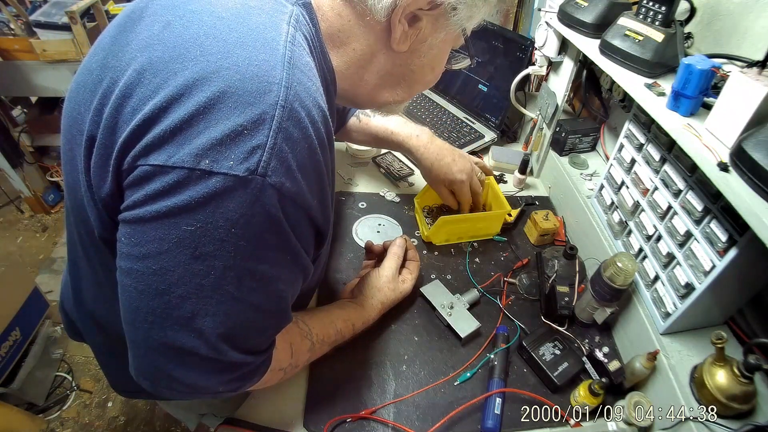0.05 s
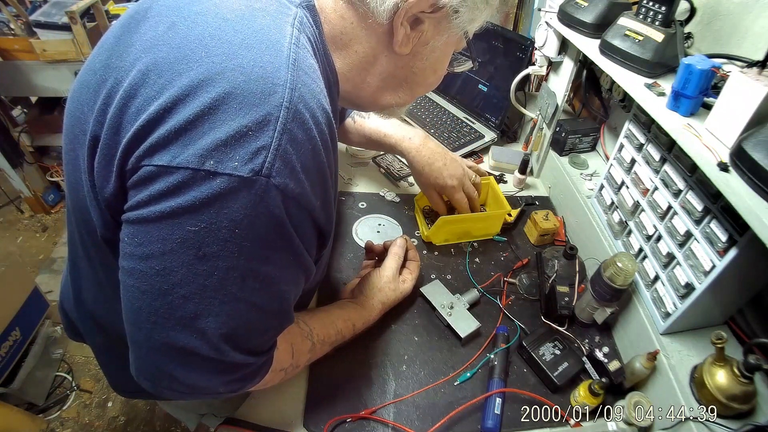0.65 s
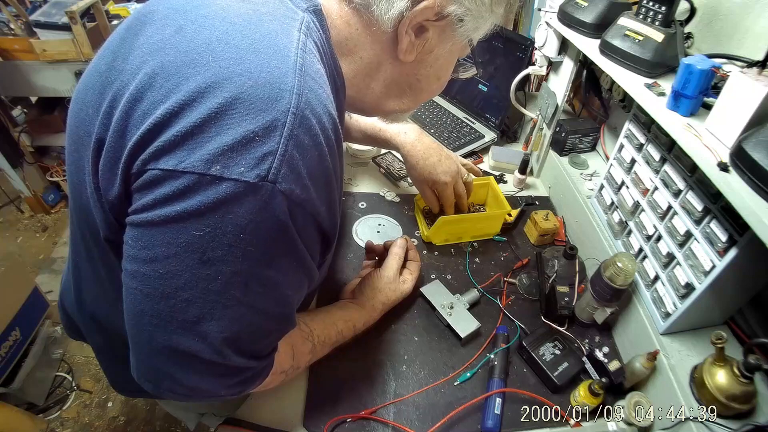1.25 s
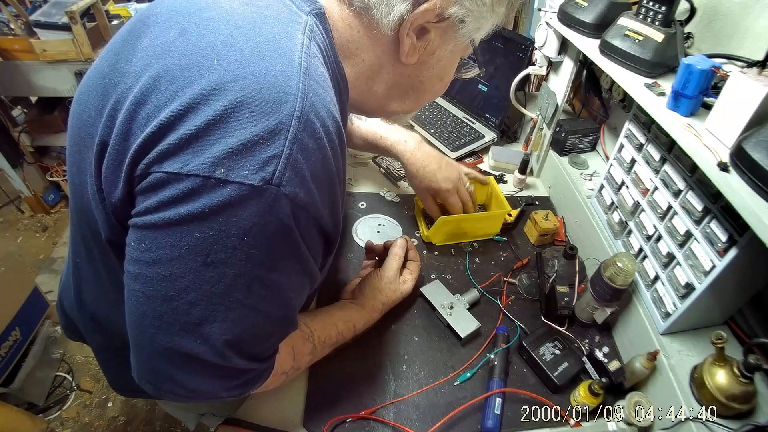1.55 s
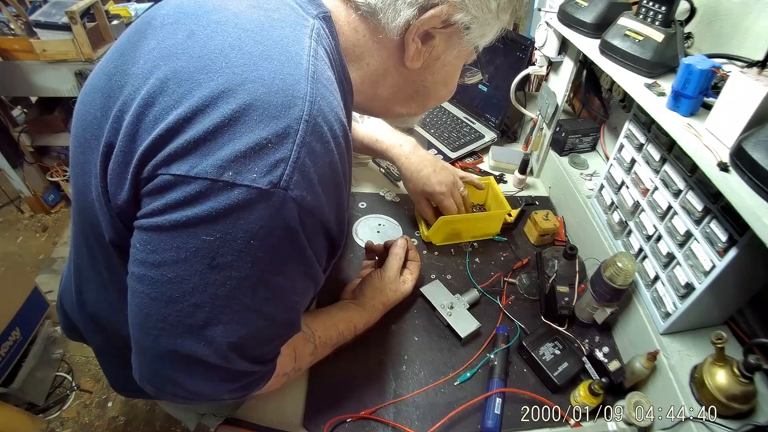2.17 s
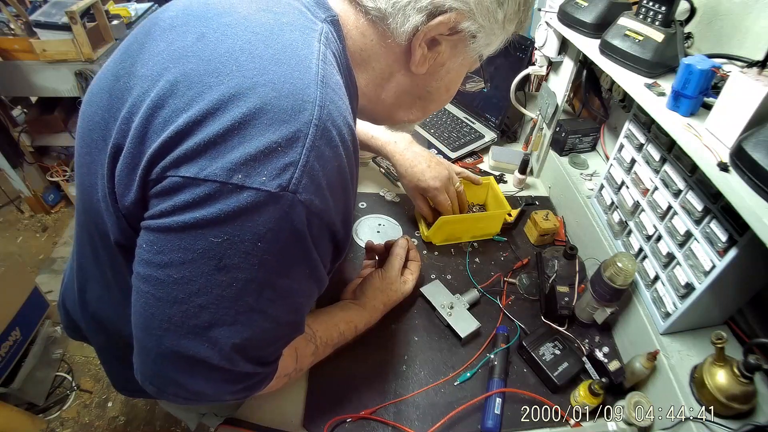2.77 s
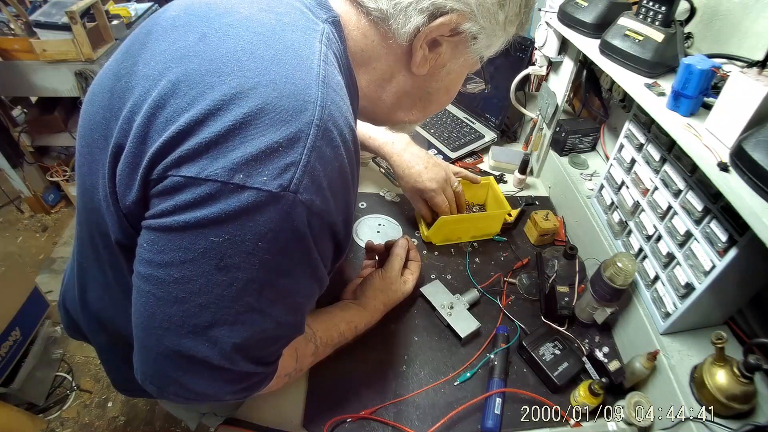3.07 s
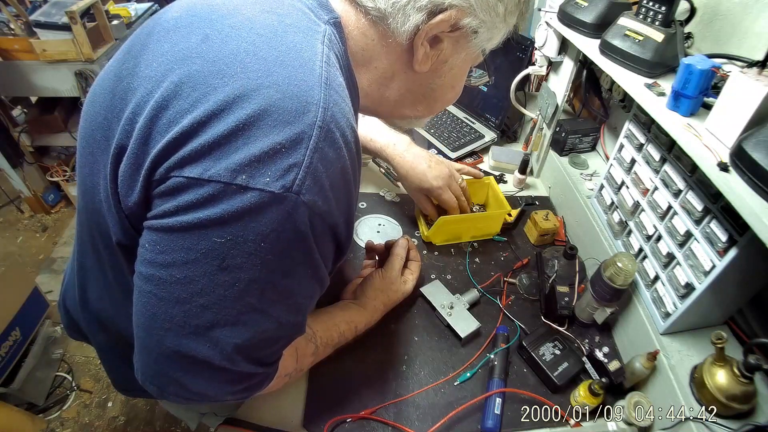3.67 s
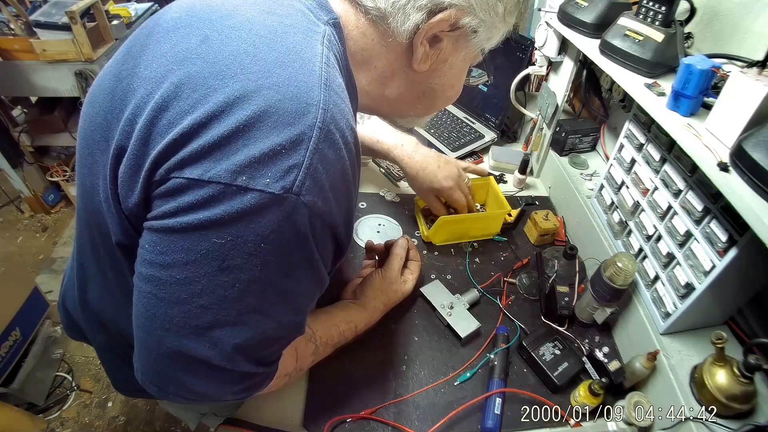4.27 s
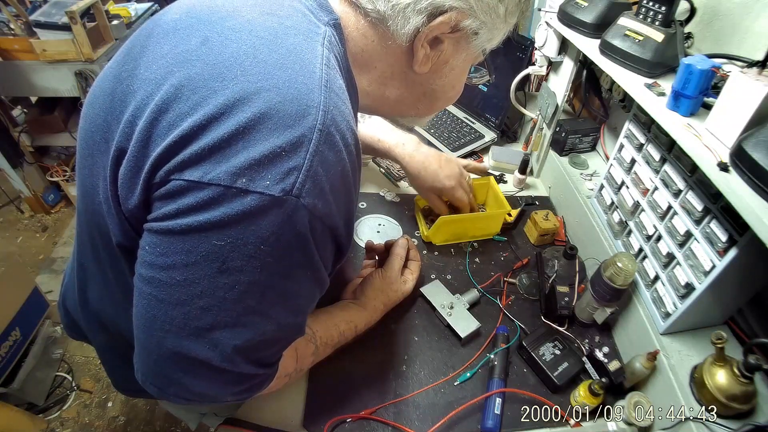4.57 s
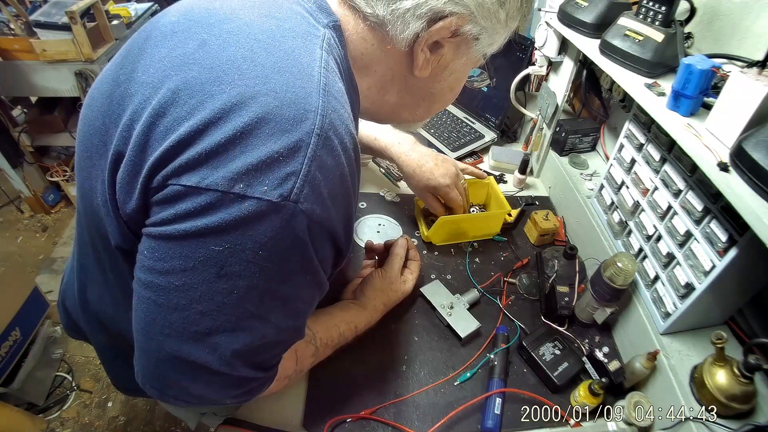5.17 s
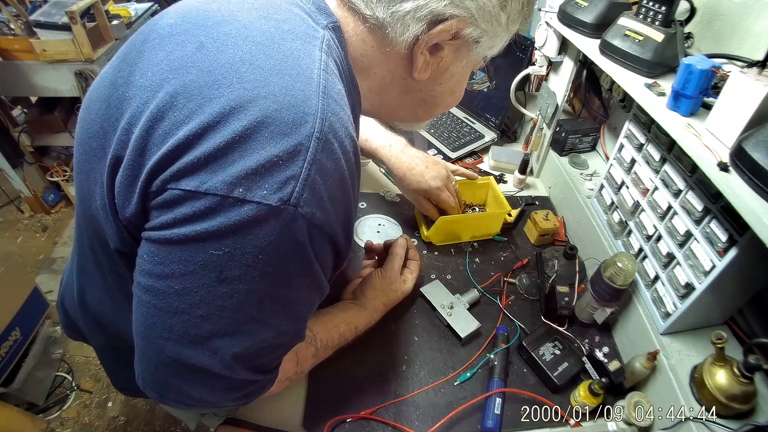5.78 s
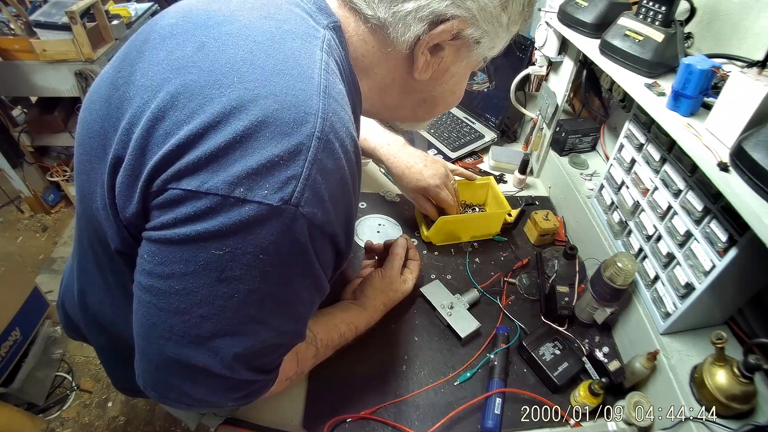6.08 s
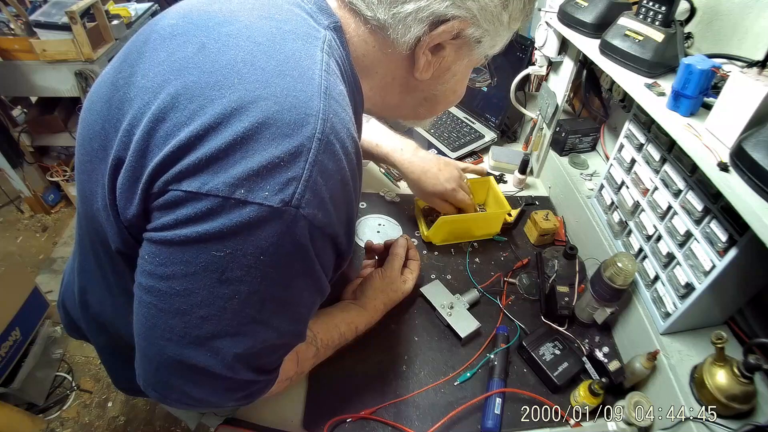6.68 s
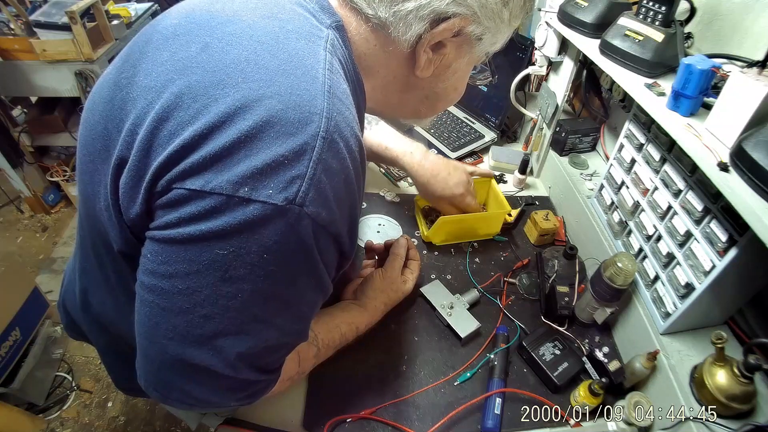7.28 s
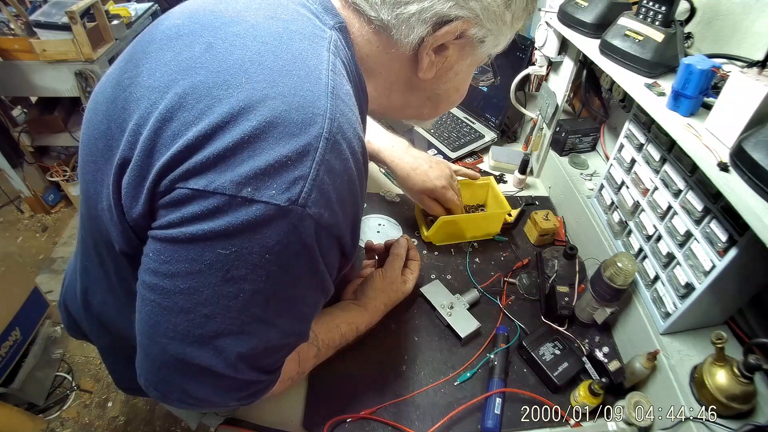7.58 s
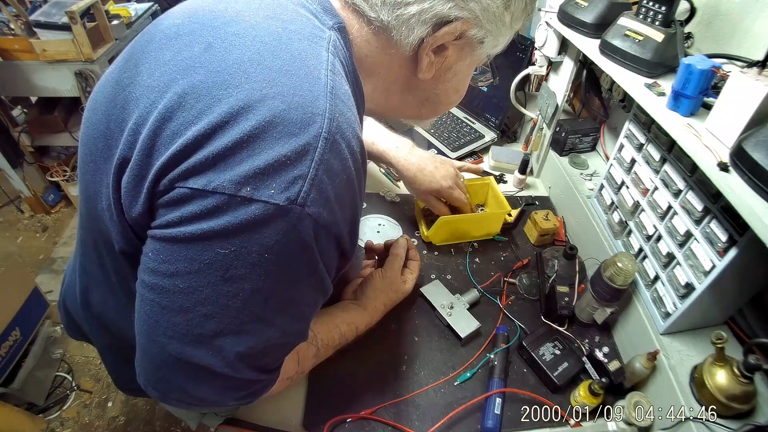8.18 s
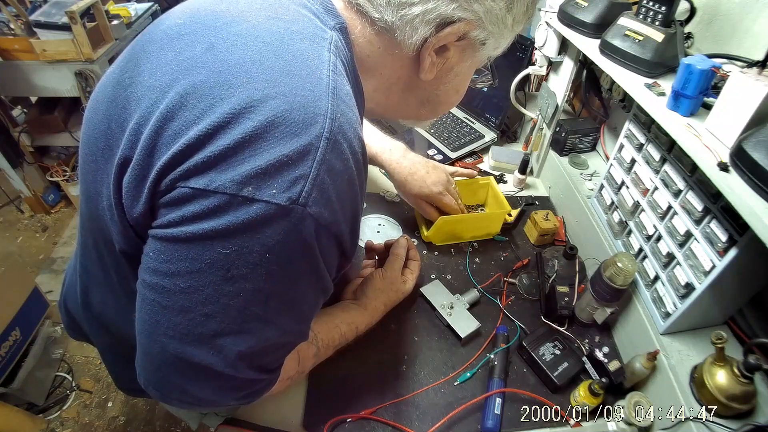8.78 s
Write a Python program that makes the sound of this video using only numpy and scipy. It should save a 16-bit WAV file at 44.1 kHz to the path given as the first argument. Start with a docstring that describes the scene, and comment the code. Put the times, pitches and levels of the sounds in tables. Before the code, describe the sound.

Small parts clatter and click against a plastic bin as fingers stir them in bursts, with short pauses, in a quiet workshop.

```python
"""A busy clatter of small loose parts: a hand rummages through a plastic bin on a workbench.
Each stroke sets off a shower of tiny collisions that ring the bin's walls. Single parts drop with a clack,
fingers knock on the hollow floor, and a few pings, metal shivers and dull bench bumps join in.
The cluttered workshop answers briefly over a soft rumble, a low hum and microphone hiss."""
import sys
import numpy as np
from scipy import signal
from scipy.fft import rfft, irfft, next_fast_len
from scipy.io import wavfile
from scipy.ndimage import uniform_filter1d

SR = 44100
rng = np.random.default_rng(int(sys.argv[2]) if len(sys.argv) > 2 else 0)


def wav_record(signal):
    """Record a signal, one row per channel, as 16-bit PCM in the file named by sys.argv[1]."""
    frames = np.transpose(np.atleast_2d(signal))
    bounded = np.clip(frames, -1, 1)
    # unit amplitude maps onto the largest positive 16-bit level
    quanta = np.round(bounded * 32767).astype(np.int16)
    wavfile.write(sys.argv[1], SR, quanta)


N = 398663
TIME = np.arange(N) / SR
AGE = np.arange(SR // 6) / SR  # time since a hit [s]

# hand strokes: (peak time [s], swell [s], fade [s], relative clatter level [dB], wall over clatter [dB])
STROKES = [(.012, 0.11, .085, -44, 0.5), (.205, .03, .04, -62.5, 18), (.24, .034, .08, -39, 2),
           (.345, 0.08, 0.092, -39, -1), (0.409, .05, 0.092, -45, 4), (.555, 0.095, 0.092, -56, 2),
           (.668, .03, 0.052, -61.5, 4), (.735, 0.039, .08, -60, 1), (.838, .11, 0.092, -49, 1),
           (0.959, .04, 0.099, -50, 3.5), (1.08, 0.078, .08, -64, 2), (1.192, 0.069, 0.058, -53, 3),
           (1.265, 0.037, 0.11, -50, 1.5), (1.4, .08, 0.091, -66, 2.5), (1.482, 0.082, 0.09, -59.5, 4),
           (1.645, .1, 0.086, -42.5, 0.5), (1.784, 0.13, 0.09, -50, 0.5), (1.872, 0.094, .08, -46, 4.5),
           (1.96, 0.049, 0.062, -49.5, -3), (2.092, .018, 0.052, -52.5, 2), (2.2, .12, .095, -41, 2.5),
           (2.335, .07, .04, -52.5, 1), (2.562, 0.04, 0.055, -52, 9), (2.625, 0.059, 0.087, -50.5, 1.5),
           (2.715, 0.046, 0.14, -60, 2.5), (2.94, 0.049, 0.064, -53, 4.5), (3.04, 0.053, 0.088, -41, -1),
           (3.455, 0.077, 0.046, -62, -7.5), (3.547, 0.029, 0.065, -61.5, -2),
           (3.745, 0.052, 0.058, -38, 1), (3.797, 0.031, 0.048, -46, 4), (3.871, 0.11, 0.091, -54, 1.5),
           (3.998, 0.035, 0.044, -51.5, 1.5), (4.063, 0.039, .06, -44, 1), (4.295, 0.072, 0.12, -50, 0.5),
           (4.372, 0.0828, 0.075, -50, 4), (4.635, 0.058, 0.0812, -41, 2.5),
           (4.69, 0.052, 0.058, -42, -1.5), (4.82, 0.098, 0.1, -63, 2), (5.42, .035, .06, -42, 1.5),
           (5.47, 0.046, 0.096, -45, 2.5), (5.56, .06, .13, -59, -0.5), (5.713, .018, 0.047, -52, 5.5),
           (6.509, 0.081, 0.08, -39, 1), (6.757, 0.051, .09, -35, 1.5), (6.814, .05, 0.05, -40, -1),
           (6.985, 0.033, 0.063, -43, 4), (7.055, 0.077, 0.069, -36, 3), (7.14, .04, 0.074, -47, 4),
           (7.335, 0.087, 0.089, -35, 1.5), (7.453, 0.039, 0.078, -53.5, 4.5),
           (8.275, 0.019, 0.055, -52.5, 4), (8.328, .025, .13, -48.5, 3.5), (8.445, 0.059, 0.096, -51, 2.5),
           (8.54, .05, 0.12, -58.5, 2.5), (8.825, .08, 0.17, -68.5, 2.5)]
STROKE_DROP_DB, STROKE_ROUND = 20, 1.25  # depth of a swell or fade; roundness of the top (1 = pointed)
REST_CLATTER_DB, REST_WALL_DB = -75, -74.5  # relative levels while the fingers only feel about
# single parts striking a wall: (time [s], wall energy [dB], clack over wall [dB], brightness [dB])
DROPS = [(0.2285, -16, 5.5, -2), (0.254, -11.5, 1, -1), (0.3163, -11, 0, 0), (0.3402, -5, -1, -19),
         (0.3944, -10.5, 0, -4), (0.41, -7, -1, -9.5), (0.7983, -26, 5, -4), (.8918, -25, 7.5, -10),
         (0.9326, -17, 7, -4.5), (0.9524, -9.5, 2, -11.5), (1.0015, -13, -13, -2), (1.5585, -23, -1, 5),
         (1.6211, -20, -2, -1), (1.6324, -8, 2, -3.5), (1.718, -27, 6, 10), (1.77, -25, 7.5, -6),
         (1.841, -24, 10, -17), (1.8619, 1.5, -8.5, -3.5), (1.9015, -15.5, 1.5, -10),
         (1.9427, -21.5, 2.5, -5), (1.9856, -19, 4.5, -14), (2.0856, -23.5, 4.5, -1), (2.216, -12.5, 0, -8),
         (2.302, -28.5, 3, -12), (2.443, -31.5, -0.5, 0), (2.5565, -23.5, 8, -9.5),
         (2.5997, -23.5, 6, -1.5), (2.8119, -34, 4, -3), (2.9053, -29.5, 5, 5), (2.9917, -12, -1, -1),
         (3.0118, -9, -1.5, -3), (3.0547, -16.5, 4, -20), (3.427, -39, 8, 4), (3.543, -31.5, 8, -5),
         (3.701, -19, 1, -4), (3.7434, -4.5, -2, -10), (3.7535, -1.5, -5, -2), (3.8996, -25, 5, -11),
         (3.9797, -24.5, -0.5, 12), (4.063, -15, 1, -2.5), (4.0878, -15, -8, -8), (4.649, -14, 0, 3),
         (5.1105, -28.5, 2.5, -6), (5.4198, -7.5, -4, -5), (5.4265, -2, -6.5, 17), (5.655, -37.5, 4, 3),
         (5.7127, -22.5, 2.5, -15), (6.471, -23.5, 8, 7), (6.525, -9, -9, 5.5), (6.7339, -5, -4.5, 7),
         (6.7715, -14, 1, 3), (6.8061, -7.5, -5, -14), (6.9829, -10, -12, 10), (7.0248, -8.5, -0.5, 0),
         (7.0731, -10, -5, -10), (7.1138, 1, -13.5, -5.5), (7.259, -14, -3, 4), (7.2817, -10, -6, 7),
         (7.3595, -4, -10, 11), (8.334, -15, -8.5, -1), (8.3603, -20, 8.5, -6), (8.4053, -14, 0, -12.5),
         (8.528, -30.5, 4, 8), (8.5823, -18.5, -2, -16), (8.7596, -37, 3.5, -2)]
DROP_THUMP_DB = -27.5  # a light part hardly moves the floor
GRAZE_LEAD_S, GRAZE_DB = .006, -12.5  # a falling part brushes its neighbours just before it strikes
# fingers knocking on the bin's floor: (time [s], thump energy [dB])
TOCKS = [(0.1759, -10.5), (.6667, -29), (0.7295, -26), (1.2967, -24), (1.6324, -18), (2.1352, -20),
         (2.5996, -21.5), (4.2555, -20), (4.3821, -20), (5.3588, -24.5), (6.414, -29), (6.7334, -21),
         (6.955, -24), (6.9849, -13.5), (8.181, -31), (8.2478, -8.5)]
TOCK_WALL_DB, TOCK_CLACK_DB, TOCK_BRIGHT_DB = -5, -18, -6  # a soft finger shakes walls but few parts

# ring of the bin's walls: (frequency [Hz], relative level [dB], t60 [s])
WALL_MODES = [(560, -16, .04), (708, -9, .045), (778, -7, .045), (832, -4, .06), (915, -9, .04),
              (975, -6, .045), (1006, 2, .065), (1140, -8, .045), (1222, -6, .055), (1280, -9, .045),
              (1370, -10, .055)]
# ring of the parts and the bin's higher modes: (frequency [Hz], relative level [dB], t60 [s])
PART_MODES = [(1554, -10.5, 0.032), (1686, -7, 0.12), (1803, -4.5, 0.051), (1946, 2.5, 0.045),
              (2020, 3.5, 0.026), (2200, 0, 0.032), (2296, -9.5, 0.023), (2410, 0, 0.036),
              (2593, -3.5, 0.068), (2840, -16.5, 0.072), (3230, -7, 0.086), (3484, -3.5, 0.068),
              (3657, -2.5, 0.042), (3877, -1.5, 0.058), (4300, -20.5, 0.11), (4630, -33, .04),
              (5066, -7, 0.041), (5620, -6, 0.02)]
# the bin's floor giving way under a blow: (frequency [Hz], relative level [dB], t60 [s])
FLOOR_MODES = [(405, -6, 0.035), (514, 0.5, 0.038), (630, -8, 0.029), (775, 0.5, 0.036)]
# the thin walls radiate little bass: (frequency [Hz], gain [dB])
WALL_EQ = [(200, -18.5), (450, 0), (620, -1.5), (760, -1.5), (1400, 1.5), (2200, -8), (5000, -23)]
# the parts are too small to radiate low tones: (frequency [Hz], gain [dB])
PART_EQ = [(300, -28), (900, -4), (1500, 0.5)]
# the crack of a hard contact: (frequency [Hz], gain [dB])
CRACK_EQ = [(900, -32.5), (1500, 2.5), (2300, 3), (2900, -3.5), (3700, 0), (5400, -2), (7000, -12.5),
            (8600, -12.5), (10500, -14), (11900, -26.5), (14000, -23), (16000, -40)]

# things left ringing freely: (time [s], pitch [Hz], level [dB], t60 [s])
PINGS = [(.378, 10770, -43.5, 0.076), (4.78, 13810, -62.5, .15), (5.73, 427.6, -49, 0.29)]
# tiny metal bits shivering against each other: (time [s], energy [dB])
SHIVERS = [(.318, -33), (.345, -32), (.377, -32), (1.634, -26)]
# the hand pressing the bin against the bench: (time [s], level [dB])
BUMPS = [(6.71, -48), (6.98, -43)]

# the workshop's reverb decay: (frequency [Hz], t60 [s])
ROOM_DECAY = [(200, 1), (1000, 0.12), (4000, 0.19), (12000, 0.77)]
# tone of the room air and hiss: (frequency [Hz], gain [dB])
AIR_EQ = [(12, -30), (20, -2), (70, -4.5), (191, -7.5), (259, -7), (315, -10), (372, -7), (465, -11.5),
          (565, -13.5), (2150, -26), (2330, -25), (4430, -32), (15500, -35)]
# the rumble's rise and fall: (time [s], relative level [dB])
RUMBLE_LEVELS = [(0, -60.5), (4.2, -62.5), (6.3, -65.5), (7, -57), (7.6, -67), (9.04, -65)]
# the hum's rise and fall: (time [s], relative level [dB])
HUM_LEVELS = [(0, -57), (1.01, -55.5), (1.9, -61), (3.1, -72), (9.04, -70)]
AIR_DB, HIGH_CUT_HZ = -60, 15700


def rattle(variants=24):
    """Parts tumble and slide over each other; a harder stroke makes more and louder collisions."""
    wall_db, clatter_db = stroke_levels()
    hits_per_s = np.clip(650 * amp(.3 * (clatter_db + 40)), 180, 1100)
    hits = np.flatnonzero(rng.random(N) < hits_per_s / SR)
    blows = np.zeros(N)
    blows[hits] = amp(3.4 * rng.standard_normal(len(hits)))
    # the collisions of a moment share the energy that the hand gives them
    blows /= np.sqrt(np.abs(uniform_filter1d(blows ** 2, size=700)) + 1e-5)
    # pieces from dull to bright, each touching its own spot of the bin
    walls = [wall_ring(push=0.43) for _ in range(variants)]
    pieces = [part_clack(crack_db=-1.5, direct=0.86, bright_db=b) for b in np.linspace(-6, 3, variants)]
    out = np.zeros(N)
    for i, k in zip(hits, rng.integers(variants, size=len(hits))):
        collision = amp(wall_db[i] - 0.8) * walls[k] + amp(clatter_db[i] - 1.42) * pieces[k]
        add(out, i / SR, blows[i] * collision)
    sliding_rustle = noise(CRACK_EQ)
    return out + amp(clatter_db - 9.0) * sliding_rustle


def stroke_levels():
    """Wall and clatter envelopes in dB: each stroke swells and fades, and overlaps add their power."""
    wall_power = np.full(N, amp(REST_WALL_DB) ** 2)
    clatter_power = np.full(N, amp(REST_CLATTER_DB) ** 2)
    for s, swell_s, fade_s, db, wall_db in STROKES:
        span = slice(max(int((s - 2 * swell_s) * SR), 0), int((s + 2 * fade_s) * SR))
        t = TIME[span] - s
        level_db = db - STROKE_DROP_DB * np.maximum(-t / swell_s, t / fade_s) ** STROKE_ROUND
        clatter_power[span] += amp(level_db) ** 2
        wall_power[span] += amp(level_db + wall_db) ** 2
    return 10 * np.log10(wall_power), 10 * np.log10(clatter_power)


def knocks():
    """Single parts hit a wall and fingers knock on the floor; each blow sounds floor, walls and parts."""
    blows = [(s, db + DROP_THUMP_DB, db, db + clack_db, bright) for s, db, clack_db, bright in DROPS]
    blows += [(s, db, db + TOCK_WALL_DB, db + TOCK_CLACK_DB, TOCK_BRIGHT_DB) for s, db in TOCKS]
    out = np.zeros(N)
    for s, thump_db, wall_db, clack_db, bright_db in blows:
        add(out, s, amp(thump_db) * floor_thump())
        add(out, s, amp(wall_db) * wall_ring(push=0.21))
        add(out, s, amp(clack_db) * skitter(bright_db))
    for s, db, clack_db, bright_db in DROPS:
        add(out, s - GRAZE_LEAD_S, amp(db + clack_db + GRAZE_DB) * skitter(bright_db))
    return out


def wall_ring(push):
    """The struck wall swings briefly under the push, then rings on in its modes."""
    swing = unit_energy(damped_sine(hz=980, t60=0.014))
    return unit_energy(colour(ring(WALL_MODES, scatter_db=6.5) + push * swing, WALL_EQ))


def part_clack(crack_db, direct, bright_db):
    """A crack and the short ring of the parts; a harder contact favours their upper modes."""
    clack = ring(PART_MODES, scatter_db=8.5) + amp(crack_db) * crack(direct) + amp(-25) * tinkle()
    hardness_eq = [(2300, 0), (3600, bright_db), (6000, bright_db),
                   (9000, min(bright_db, .5 * bright_db))]
    return unit_energy(colour(colour(clack, PART_EQ), hardness_eq))


def crack(direct):
    """A sharp click of strength `direct` and its quick echoes between the bin's walls."""
    burst = unit_energy(rng.standard_normal(len(AGE)) * fade(AGE, t60=0.059))
    burst[0] += direct
    return unit_energy(colour(burst, CRACK_EQ))


def skitter(bright_db, contacts=3):
    """A part lands on its neighbours in a few quick contacts, each softer than the last."""
    out = np.zeros(len(AGE))
    gaps_s = .003 * rng.uniform(.5, 1.5, contacts)
    for k, s in enumerate(np.cumsum(gaps_s) - gaps_s[0]):
        add(out, s, amp(-2.5 * k) * part_clack(crack_db=0, direct=0.35, bright_db=bright_db))
    return unit_energy(out)


def floor_thump():
    """The hollow thunk of the bin's floor, too small to give deep bass."""
    floor_eq = [(200, -29.5), (480, -6.5), (1000, 0.5), (3000, -23)]
    return unit_energy(colour(ring(FLOOR_MODES, scatter_db=5.5), floor_eq))


def tinkle(mode_count=6):
    """A tiny metal piece rings in a few high modes of its own."""
    modes = [(hz, along(CRACK_EQ, hz), .07) for hz in rng.uniform(5000, 15000, mode_count)]
    return ring(modes, scatter_db=14)


def pings():
    """Now and then something rings on with one clear tone."""
    out = np.zeros(N)
    attack = 1 - fade(AGE, t60=0.014)
    for s, hz, db, t60 in PINGS:
        add(out, s, amp(db) * damped_sine(hz, t60) * attack)
    return out


def shivers(mode_count=16):
    """The smallest bits ring in a cloud of very high modes."""
    out = np.zeros(N)
    for s, db in SHIVERS:
        modes = [(hz, 0, .09) for hz in rng.uniform(12000, 15500, mode_count)]
        add(out, s, amp(db) * ring(modes, scatter_db=6))
    return out


def bench_bumps():
    """The bench top gives a dull bump as the hand presses the bin against it."""
    out = np.zeros(N)
    attack = 1 - fade(AGE, t60=0.049)
    for s, db in BUMPS:
        add(out, s, amp(db) * damped_sine(hz=60, t60=0.21) * attack)
    return out


def workshop_reverb(x):
    """A diffuse tail; the mids die first, while lows and the very top linger."""
    hz, t, spectrum = signal.stft(rng.standard_normal(SR // 2), SR, nperseg=256)
    decay = fade(t, along(ROOM_DECAY, hz)[:, None])
    _, tail = signal.istft(spectrum * decay, SR, nperseg=256)
    response = np.pad(unit_energy(tail), (SR // 200, 0))  # 5 ms pre-delay
    return signal.fftconvolve(x, response)[:N]


def room_tone():
    """Room air with microphone hiss, a soft rumble and a wavering hum near 69 Hz."""
    air = amp(AIR_DB) * noise(AIR_EQ)
    rumble = noise([(25, -2.5), (90, 1.5), (300, -1.5), (700, -6.5), (3000, -30)])
    hum = noise([(55, -51.5), (66, -12), (69, 7), (72, 1), (85, -71), (400, -100)])
    return air + amp(envelope(RUMBLE_LEVELS) + 2.5) * rumble + amp(envelope(HUM_LEVELS) - 7.5) * hum


def ring(modes, scatter_db):
    """Damped modes with a total energy of 1; every spot that is struck weights them anew."""
    hz, db, t60 = np.transpose(modes)[:, :, None]
    gain = amp(db + scatter_db * rng.uniform(-1, 1, hz.shape))
    polarity = rng.choice([-1, 1], hz.shape)
    detune = 1 + .006 * rng.standard_normal(hz.shape)  # fingers and parts load the walls
    return unit_energy(np.sum(gain * polarity * damped_sine(hz * detune, t60), axis=0))


def damped_sine(hz, t60):
    """One mode ringing out after a hit."""
    return np.sin(2 * np.pi * hz * AGE) * fade(AGE, t60)


def noise(eq):
    """A bed of coloured noise at rms 1."""
    x = colour(rng.standard_normal(N), eq)
    return x / np.sqrt(np.mean(x ** 2) + 1e-20)


def colour(x, eq):
    """Minimum-phase EQ through (frequency [Hz], gain [dB]) points."""
    size = 2 * next_fast_len(len(x))
    gain = amp(along(eq, np.fft.rfftfreq(size, 1 / SR)))
    cepstrum = irfft(np.log(gain), size)
    # fold onto positive time so nothing rings ahead of a hit
    cepstrum[1:size // 2] *= 2
    cepstrum[size // 2 + 1:] = 0
    return irfft(rfft(x, size) * np.exp(rfft(cepstrum)), size)[:len(x)]


def along(points, hz):
    """Read (frequency [Hz], value) points on a log axis."""
    point_hz, values = np.transpose(points)
    return np.interp(np.log(hz + 1), np.log(point_hz), values)


def envelope(points):
    """One level per sample from (time [s], level [dB]) points."""
    return np.interp(TIME, *np.transpose(points))


def fade(t, t60):
    """Exponential decay, 60 dB down at t60."""
    return np.exp(-np.log(1000) * t / t60)


def amp(db):
    """Decibels to gain."""
    return 10 ** (np.asarray(db) / 20)


def unit_energy(x):
    """Scale to energy 1."""
    return x / np.linalg.norm(x)


def add(track, s, sound):
    """Mix a sound in at s seconds."""
    span = track[max(round(s * SR), 0):][:len(sound)]
    span += sound[:len(span)]


def scene():
    """The bin up close, with the workshop's reverb and room tone behind it, in mono."""
    close = rattle() + knocks() + pings() + shivers() + bench_bumps()
    return (close + amp(-11) * workshop_reverb(close) + room_tone())[None]


def record(dry):
    """A brick-wall high cut takes off the very top."""
    size = next_fast_len(N + SR // 2)
    passband = np.fft.rfftfreq(size, 1 / SR) < HIGH_CUT_HZ
    return irfft(rfft(dry, size) * passband, size)[..., :N]


dry = scene()
out = record(dry)
wav_record(out)
```